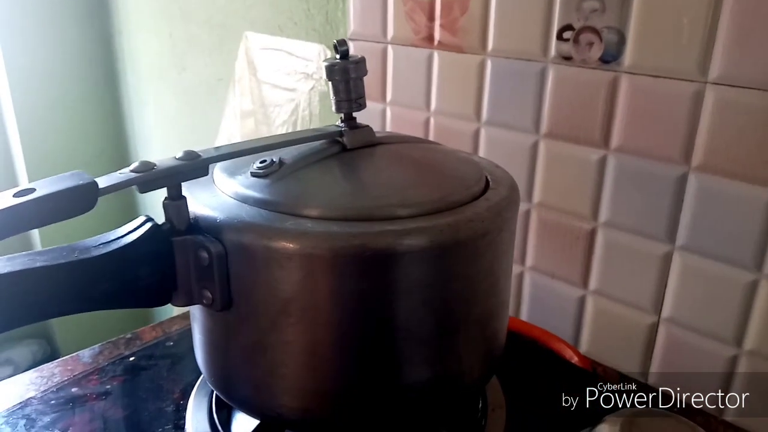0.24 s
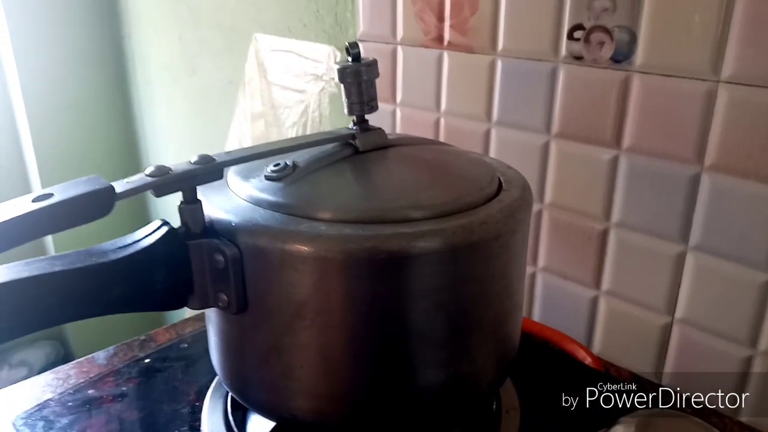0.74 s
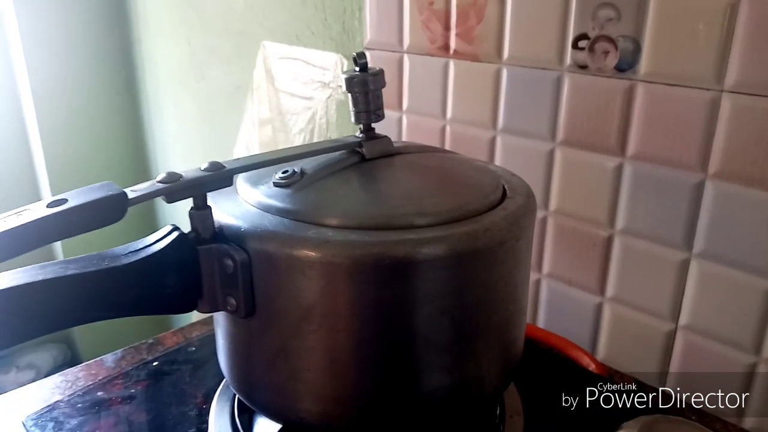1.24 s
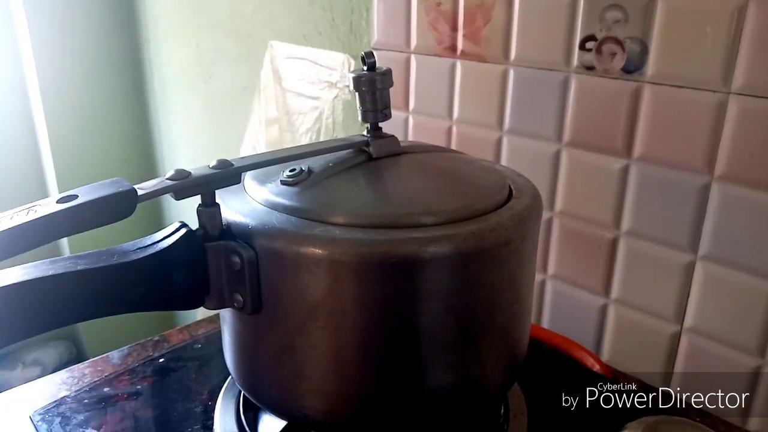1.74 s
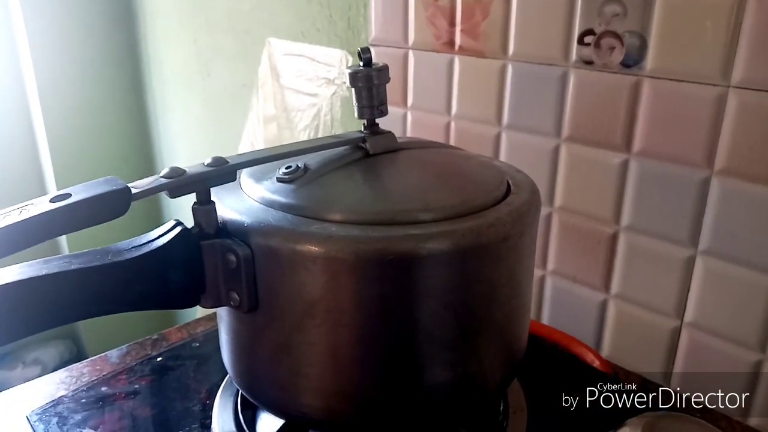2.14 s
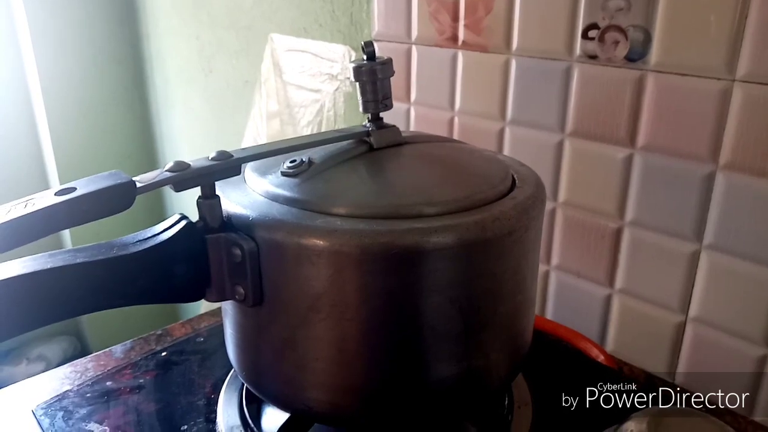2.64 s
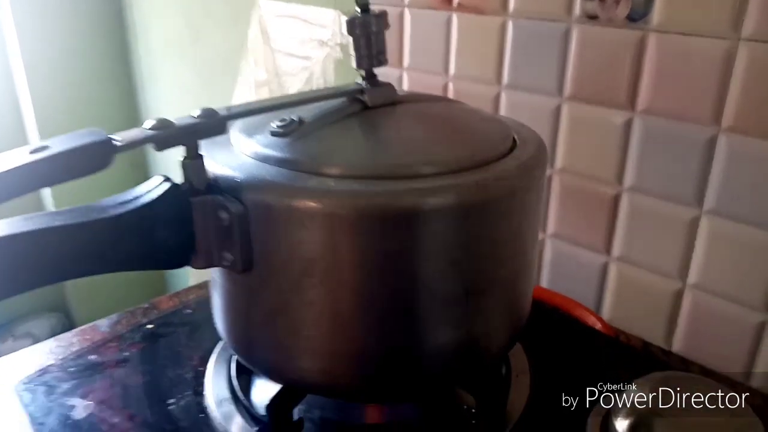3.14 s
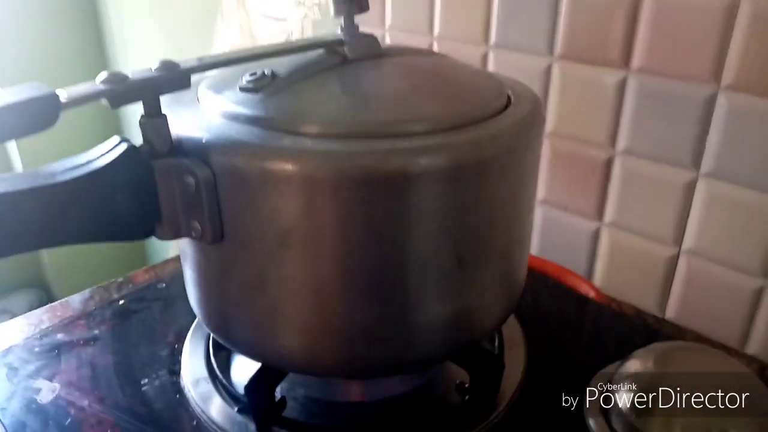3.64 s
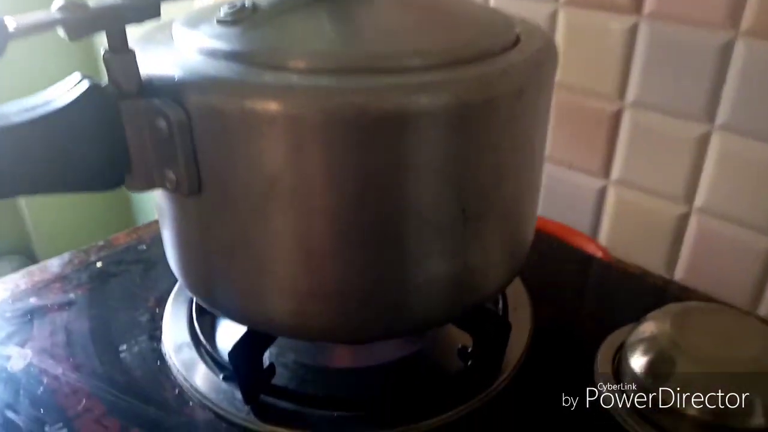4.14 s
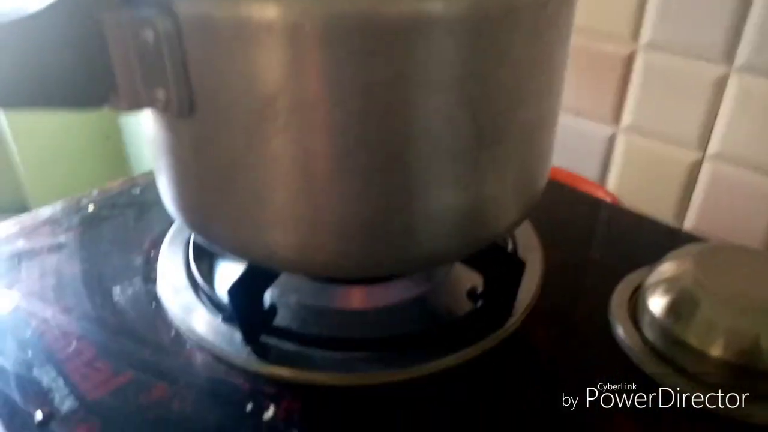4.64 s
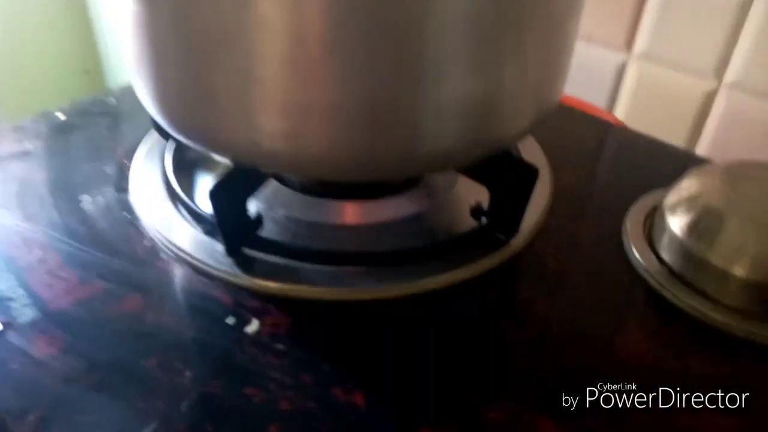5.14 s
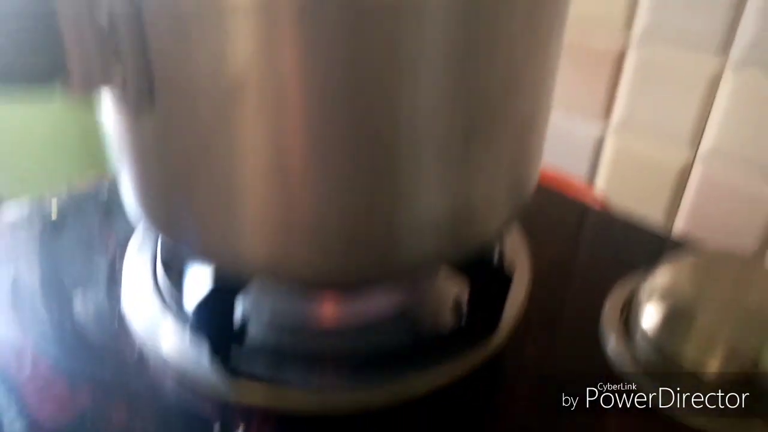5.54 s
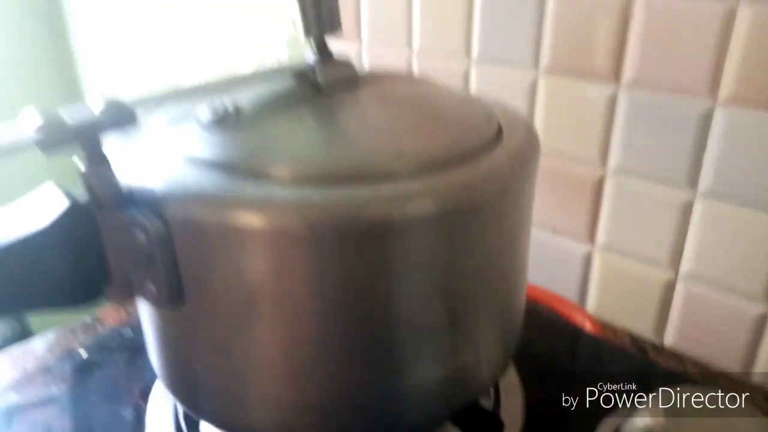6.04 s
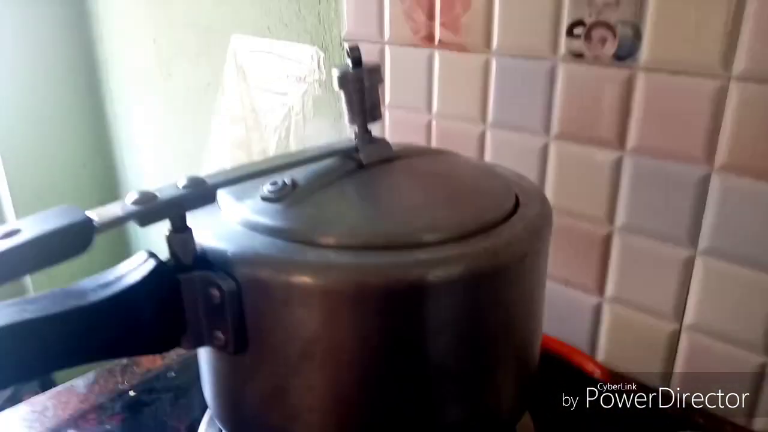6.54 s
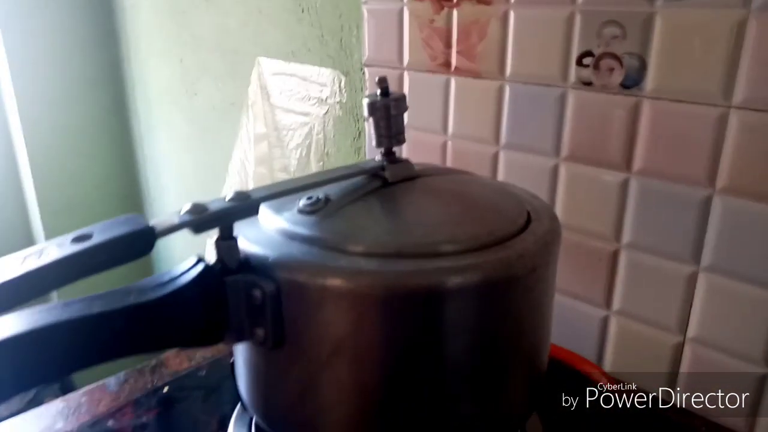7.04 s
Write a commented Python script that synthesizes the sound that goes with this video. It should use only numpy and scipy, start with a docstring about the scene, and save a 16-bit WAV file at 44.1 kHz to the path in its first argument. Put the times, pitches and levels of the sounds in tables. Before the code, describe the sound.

In a small tiled kitchen, a pressure cooker on a gas ring leaks steam in a constant breathy hiss. After a second the valve weight lifts repeatedly, giving short bright gushes with dull puffs. It settles, then gushes again around four, five and a half, and six and a half seconds. Low rumble comes and goes, with a few faint ticks. The close hand-held mono microphone dips toward the burner and rises.

```python
"""A tiled kitchen: a pressure cooker on a gas ring, close to a hand-held mono microphone.
Steam leaks under the valve weight as four bands of shaped noise with a breathy, gliding ridge; the weight
lifts in bouts, and each lift swells the bands into a brighter gush; dull puffs of air come mostly during lifts.
Noise through bass resonances makes a low rumble that comes and goes; the gas ring hisses; a few dull ticks fall.
The microphone dips below the rim and rises again, and close echoes from the tiles comb the hiss."""
import sys
import numpy as np
from scipy import signal
from scipy.fft import rfft, irfft, next_fast_len
from scipy.io import wavfile
from scipy.ndimage import uniform_filter1d, map_coordinates

SR = 44100
rng = np.random.default_rng(int(sys.argv[2]) if len(sys.argv) > 2 else 0)


def put_to_file(sound):
    """Save the sound as 16-bit audio at rate SR, in the file named by the first command-line argument."""
    columns = np.atleast_2d(sound).T  # one column per channel
    safe = np.clip(columns, -1, 1)
    whole_steps = np.round(safe * 32767)
    wavfile.write(sys.argv[1], SR, whole_steps.astype(np.int16))


N = 321028  # samples, about 7.28 s

# The microphone sinks below the rim and rises. Each row: time in seconds, share of the way down (0-1).
MIC_LOWERED = [(0, 0.11), (2.8, 0.15), (3.6, 0.32), (4.4, 0.47), (5.6, 0.51), (6.3, 0.37), (6.9, 0.06),
               (7.28, 0)]


def amp(db):
    """Amplitude factor for a level in dB."""
    return 10 ** (np.asarray(db) / 20)


def unit(x):
    """Scale to an rms of 1."""
    return x / np.sqrt(np.mean(x ** 2) + 1e-20)


def ease(u):
    """A smooth step from 0 to 1."""
    u = np.clip(u, 0, 1)
    return u * u * (3 - 2 * u)


def bell(t, s, spread, order=2):
    """A bump of height 1 around s; a higher order flattens its top."""
    return np.exp(-np.abs((t - s) / spread) ** order / 2)


def along(points, hz):
    """Read a curve of (Hz, value) points on a log frequency axis."""
    f, v = np.transpose(points)
    return np.interp(np.log(hz + 1), np.log(f + 1), v)


def curves(rows):
    """One value per sample for each column after the time."""
    s, *cols = np.transpose(rows)
    t = np.arange(N) / SR
    return [np.interp(t, s, c) for c in cols]


def wobble(rate):
    """A smooth random curve with rate knots a second."""
    knots = rng.standard_normal(int(N * rate / SR) + 4)
    return map_coordinates(knots, [np.arange(N) * rate / SR])


def filtered(x, response):
    """Multiply the spectrum of x by a response of frequency, real or complex."""
    m = next_fast_len(N + SR // 2)
    spectrum = rfft(x, m) * response(np.fft.rfftfreq(m, 1 / SR))
    return irfft(spectrum, m)[..., :N]


def patches(shape, bins, frames):
    """A random field over frequency and time, smoothed over bins and frames, of rms 1."""
    across_hz = uniform_filter1d(rng.standard_normal(shape), size=bins, axis=0)
    return unit(uniform_filter1d(across_hz, size=frames, axis=1))


def turbulence(patchy_db, streak_db, spit_db, spits):
    """Noise with brief patches and long narrow streaks of random gain, and sparse spits (about so many a second)."""
    z = signal.stft(rng.standard_normal(N), nperseg=512)[2]
    field_db = patchy_db * patches(z.shape, 6, 8) + streak_db * patches(z.shape, 2, 90)
    air = unit(signal.istft(z * amp(field_db), nperseg=512)[1][:N])
    drops = (rng.random(N) < spits / SR) * rng.uniform(-1.7, 1, N) * amp(spit_db)
    return air + drops


def booming(levels_db, modes):
    """Low noise that rings in bass resonances, each wavering around its own level."""
    out = np.zeros(N)
    for level_db, (c, w) in zip(levels_db, modes):
        resonance = lambda f: (1j * f * w / (c * c - f * f + 1j * f * w)) ** 2
        boom = filtered(rng.standard_normal(N), resonance)
        out += amp(level_db + 1.9 * wobble(22)) * unit(boom)
    return out


def bass_swells(puff_db):
    """The room's restless bass: the powers of its resting level, its swells and the puffs add up."""
    # Room resonances. Each row: centre in Hz, width in Hz.
    room_modes = [(118.2, 18), (150, 62), (73, 84), (304, 145)]
    # Swells. Each row: middle in seconds, length in seconds, then the level of each resonance in dB.
    swells = [(.34, 0.12, -56, -60, -72, -81), (.51, .09, -61, -61, -78, -65),
              (.72, 0.22, -55, -59, -71, -83), (1.14, 0.19, -52, -56, -72, -64),
              (1.625, 0.095, -59, -72, -80, -72), (1.85, 0.092, -62, -74, -80, -75),
              (2.47, 0.15, -64, -72, -69, -64), (2.63, 0.14, -67, -60, -80, -78),
              (2.95, 0.29, -62, -56.5, -70, -82), (3.37, .2, -59, -62, -66, -59),
              (3.86, .11, -56, -60, -80, -79), (4.065, 0.081, -59, -68, -82, -70),
              (4.33, 0.14, -54, -58, -72, -67), (4.56, 0.28, -52, -59.5, -70, -69),
              (4.99, 0.095, -55, -61, -74, -75), (5.125, 0.11, -54, -62, -72, -60),
              (5.74, .21, -49, -64, -71, -74), (5.93, 0.14, -60, -61, -68, -66),
              (6.72, 0.18, -49, -56, -62, -70), (6.95, 0.34, -50.5, -63, -58, -63),
              (7.25, 0.11, -51, -68, -62, -65)]
    # One value for each resonance: its level at rest in dB.
    still_db = [-72, -71, -75, -73]
    # One value for each resonance: its level against the chuff of a puff in dB.
    thump_db = [-28, -13, -34, -40]
    t = np.arange(N) / SR
    power = amp(still_db)[:, None] ** 2 + np.outer(amp(thump_db), amp(puff_db)) ** 2
    for s, length, *db in swells:
        at = slice(max(round((s - .4) * SR), 0), round((s + .4) * SR))
        shape = bell(t[at], s, length / 2.5, order=4)
        power[:, at] += np.outer(amp(db), shape) ** 2
    return booming(10 * np.log10(power), room_modes)


def heavy_rumble():
    """Half a second in four resonances, the strongest (near 120 Hz) throbbing and fading; also its on/off curve."""
    # One row: start in seconds, stop in seconds, length of the edges in seconds.
    span = (6.0, 6.49, 0.033)
    # Each row: centre in Hz, width in Hz.
    modes = [(119.6, 17), (181, 38), (301.6, 310), (75, 48)]
    # One value for each resonance: level in dB; the first also moves as set below.
    mode_db = [-34.5, -43, -54, -60]
    throb_hz, throb_crest_s, throb_db = 10.4, 6.085, 8
    late_s, fade_db_per_s = 0.035, 20
    t = np.arange(N) / SR
    start, stop, edge = span
    during = ease((t - start) / edge + .5) * ease((stop - t) / edge + .5)
    level_db = np.outer(mode_db, np.ones(N))
    # the resonance near 120 Hz throbs, fades, and comes in late, from 15 dB down
    level_db[0] += throb_db * np.cos(2 * np.pi * throb_hz * (t - throb_crest_s))
    level_db[0] -= fade_db_per_s * (t - start)
    level_db[0] -= 15 * ease((start + late_s - t) / edge + .5)
    return during, booming(level_db, modes)


def rumble(puff_db):
    """The bass of the room, giving way to the heavy rumble while that lasts."""
    room = bass_swells(puff_db)
    during, heavy = heavy_rumble()
    return (1 - during) * room + during * heavy


def flame():
    """The soft mid hiss of the gas ring: patchy noise under a fixed colour."""
    # Each row: time in seconds, level in dB before a common 2.5 dB cut.
    burn = [(0.0, -54), (0.14, -79), (0.56, -45), (2.15, -39), (2.35, -47), (2.61, -48), (2.82, -53),
            (3.04, -40.5), (3.36, -45), (3.63, -43.5), (3.79, -42), (4.07, -43), (4.24, -43), (4.74, -45),
            (5.58, -41), (6.02, -48), (6.45, -42.5), (7.28, -41.5)]
    # Each row: frequency in Hz, relative density in dB per Hz.
    colour = [(500, -27), (900, -12.5), (1300, -6.5), (1650, -0.5), (2000, -4), (2600, -38)]
    air = turbulence(patchy_db=3.5, streak_db=-1.0, spit_db=-3, spits=42)
    hiss = unit(filtered(air, lambda hz: amp(along(colour, hz))))
    return amp(curves(burn)[0] - 2.5) * hiss


def ticks():
    """Short dull bumps without ring: a soft 620 Hz push with grit on it, dying 60 dB in 8.5 ms."""
    # Each row: start in seconds, level in dB before a common 6 dB lift.
    bumps = [(4.327, -38.5), (5.836, -35), (6.154, -39), (6.515, -45)]
    out, t = np.zeros(N + SR), np.arange(800) / SR
    grit = uniform_filter1d(rng.standard_normal((len(bumps), len(t))), size=12, axis=1)
    for (s, db), g in zip(bumps, grit):
        push = np.sin(2 * np.pi * 620 * t) + 2.5 * g
        out[round(s * SR):][:len(t)] += amp(db + 6 - 60 * t / 0.0085) * push
    return out[:N]


def tiles(x):
    """Close echoes comb the hiss finely; their paths shorten as the microphone sinks."""
    # Each row: delay in seconds with the microphone at lid height, level in dB against the direct sound.
    reflections = [(.0017, -26.5), (.0062, -22.5), (.0091, -18.5), (0.0127, -16.5), (0.0178, -20),
                   (.0231, -15.5)]
    at = np.arange(N)
    stretch = 1 - 0.0301 * curves(MIC_LOWERED)[0]
    echoes = sum(amp(db) * map_coordinates(x, [at - s * SR * stretch]) for s, db in reflections)
    return (x + echoes) / np.sqrt(1 + sum(amp(db) ** 2 for _, db in reflections))


def chuff(level_db):
    """The dull push of air in the puffs and under the leak: patchy noise under a low colour."""
    # Each row: frequency in Hz, relative density in dB per Hz.
    colour = [(35, -38), (60, -9), (302, 2), (1130, 3), (1230, 2), (1500, 0.5), (1950, -24), (3300, -120)]
    air = turbulence(patchy_db=2.5, streak_db=1.8, spit_db=-2, spits=45)
    body = unit(filtered(air, lambda hz: amp(along(colour, hz))))
    return amp(level_db + 4.0) * body


def whistle(skirt_db):
    """The valve gap's breathy ridge: narrow noise gliding around 5.0-5.7 kHz, its level following the skirt band."""
    # Each row: time in seconds, centre in Hz, level in dB against the skirt band.
    ridge = [(0, 5500, -7.5), (2.4, 5670, -15), (3.3, 5580, -7), (3.7, 5320, -8.5), (4.5, 5450, -3),
             (4.9, 5350, -5), (5.2, 5100, -1.5), (5.5, 5040, -8), (5.8, 5370, -7.5), (7.28, 5430, -2)]
    hz, rel_db = curves(ridge)
    a, b = filtered(rng.standard_normal((2, N)), lambda f: 1 / (1 + (f / 220) ** 2))
    turn = 2 * np.pi * np.cumsum(hz) / SR
    return amp(skirt_db + rel_db) * unit(a * np.cos(turn) + b * np.sin(turn))


def steam(bands_db):
    """Hiss in four bands, each at its own level; the colour slides from leak to gush as the jet grows."""
    # Four colours of the hiss. Each row: frequency in Hz, relative density in dB per Hz.
    # Weight seated, heard from lid height.
    seated_high = [(530, -45), (900, -32.5), (1570, -16), (1840, -16), (2190, -4), (2850, -3.5),
                   (3450, -7.5), (3970, -4.5), (4690, -10), (5410, -5), (8110, -15), (10400, -2.5),
                   (12700, -13), (14900, -3), (15400, -9)]
    # Weight seated, heard from below the rim.
    seated_low = [(530, -47), (900, -24.5), (1460, -12.5), (2090, -28), (2590, -1.5), (3060, -4.5),
                  (3530, -11), (5290, -8), (6390, 1.5), (6950, -16.5), (8110, -11.5), (10800, -7.5),
                  (12900, -13), (14700, -4), (15400, -10)]
    # Weight lifted, heard from lid height.
    lifted_high = [(880, -38), (1500, -11), (1750, -9), (2370, 5.5), (2740, 7), (4130, -4), (4650, -3),
                   (5020, -7.5), (5540, -4), (6470, -4), (8340, -11), (10800, -1.5), (13400, -7),
                   (14500, 3), (15400, -0.5)]
    # Weight lifted, heard from below the rim.
    lifted_low = [(880, -32.5), (1500, -8), (1990, -17), (2770, -1), (4340, -2), (5170, 7.5), (5760, 3.5),
                  (6470, 6.5), (7060, -17), (7640, -8), (8250, -15), (10900, -4.5), (13200, -15),
                  (14700, -5), (15400, -4)]
    # Centres of the throat, skirt, jet and fizz bands in Hz.
    anchor_hz = [3000, 5200, 9500, 14000]
    lift = np.clip((bands_db[2] + 32.5) / 8, 0, 1)
    low = np.clip(curves(MIC_LOWERED)[0], 0, 1)
    flutter = amp(0.17 * wobble(17) + 0.36 * wobble(40))
    air = flutter * turbulence(patchy_db=1.06, streak_db=2.0, spit_db=11.5, spits=130)
    out = np.zeros(N)
    for k, level_db in enumerate(bands_db):
        band = np.c_[anchor_hz, np.eye(4)[k]]  # 1 at its own centre, 0 at the others
        leak, shaded, gush, shaded_gush = [
            unit(filtered(air, lambda hz: amp(along(colour, hz)) * along(band, hz)))
            for colour in (seated_high, seated_low, lifted_high, lifted_low)]
        seated = (1 - low) * leak + low * shaded
        lifted = (1 - low) * gush + low * shaded_gush
        out += amp(level_db) * ((1 - lift) * seated + lift * lifted)
    return out


def valve():
    """The weight rocks, lifts and seats: levels in dB of the four hiss bands, the puffs and the whole chuff."""
    # The slow leak between lifts. Each row: time in seconds, then the levels in dB of the throat, skirt,
    # jet and fizz bands.
    seep = [(0, -32.5, -31.5, -35, -38), (.45, -30, -29.5, -33.5, -36), (.8, -28.5, -29.5, -31, -35),
            (1.22, -31, -29, -36.5, -34.5), (2.2, -32, -29.5, -33, -37.5), (2.42, -32.5, -33, -37.5, -36.5),
            (3.2, -33, -30.5, -34.5, -35.5), (3.58, -30.5, -29, -30.5, -35.5), (4.62, -32.5, -30, -37, -41),
            (4.85, -32, -27, -35, -37), (5.15, -33.5, -26.5, -31, -34), (5.62, -32, -27.5, -38, -40),
            (5.9, -31.5, -29, -35.5, -39), (6.35, -31, -29, -31.5, -33), (6.9, -31, -29, -35.5, -36),
            (7.28, -34, -30, -34, -33)]
    # Lifts of the weight. Each row: time it drops back in seconds, length of the lift in seconds, rise in
    # seconds, share of the swell that sags away, swells of throat, skirt, jet and fizz in dB, dip in dB as
    # it seats (a bump where negative).
    lifts = [(1.038, .24, .15, 0, -0.5, 3.5, 5.2, 8.1, 4.5), (1.17, 0.15, .03, .5, 1.5, 3.3, 2.6, 2, -2),
             (1.6, 0.43, 0.37, 0, 2.5, 2.3, 7.8, 9, 3), (1.822, 0.24, .1, 0, 5, 3.7, 8, 12, 5),
             (2.025, 0.25, 0.15, 0, 4.5, 2.7, 6.7, 14.7, 3), (2.252, 0.23, 0.056, 0, 3.5, 2, 5.7, 11.6, 2),
             (2.39, .13, 0.019, 0.93, 4.5, 4.1, 2, 1.8, -1),
             (3.828, 0.27, 0.18, 0.17, 2.5, 2.6, 5.6, 10.4, 0), (4.02, 0.17, 0.028, .5, -1, 4, 4.6, 8, 7),
             (4.227, 0.21, 0.094, 0, 4.5, 2.2, 8.5, 14, 4), (4.31, 0.077, 0.037, 0, 7.5, 5.7, 8.3, 7, -5),
             (4.579, 0.28, 0.084, 0.87, 4.5, 5.2, 8.6, 8.1, 1),
             (5.333, 0.2, 0.12, 0.13, 1.5, 2.6, 8.7, 14, 6), (5.586, 0.26, 0.1, .3, 3.5, 5.2, 12.2, 16, 5),
             (5.7, .1, .03, .5, 1, 1.8, 2, 3, -4), (6.635, .27, 0.26, 0, 3.5, 4, 10.5, 14, 0),
             (6.711, 0.078, 0.043, 0, -3, 3.4, 6.7, 10, -2),
             (6.85, .135, 0.025, 0.67, 2.5, 1.6, 4.2, 4.4, 1)]
    # One value for each band: seconds it takes to die as the weight falls back.
    fall_s = [0.088, 0.042, 0.051, 0.052]
    # One value for each band: its share of the seating dip.
    dip_share = [0.76, 0.47, 0.3, 1]
    # Puffs of dull air, most of them during a lift. Each row: middle in seconds, spread in seconds (scaled
    # for each use), level of the chuff in dB before its common lift, throat swell in dB, lag of that swell
    # in seconds.
    puff_rows = [(.52, 0.028, -63, 0, 0), (.955, 0.013, -60, 8, 0.018), (1.15, 0.053, -64, 0, 0.0043),
                 (1.515, .025, -45.5, 5.5, 0.0049), (1.745, 0.03, -51.5, 2.5, -0.022),
                 (1.955, 0.026, -49, 4, 0.031), (2.09, 0.014, -53, 1, 0.011), (2.3, 0.022, -61, 1, -2),
                 (3.735, 0.032, -44.5, 6, 0.013), (3.87, 0.015, -61, 3.5, 0.018),
                 (4.158, 0.023, -38.5, 5.5, -0.0011), (5.258, 0.02, -42.5, 7.5, 0.014),
                 (5.472, 0.037, -44.5, 3.5, -0.0017), (6.574, 0.023, -42, 8.5, 0.0073),
                 (6.77, 0.033, -51.5, 0.5, -0.035), (6.92, 0.045, -55.5, 0, -2.5)]
    # The throat hushes before it swells. One row: lead in seconds, spread in seconds, share of the swell.
    hush = (0.073, 0.019, 0.38)
    seat_s = 0.0059  # spread of the dip as the weight seats
    jet_share = 0.49  # of the throat's swell, in the jet
    chuff_under_db, chuff_waver_db = -32.5, 3  # chuff of the leak against its throat; how far it wavers
    t = np.arange(N) / SR
    bands_db, puffs = np.array(curves(seep)), np.full(N, 1e-12)
    leak = amp(bands_db[0] + chuff_under_db + chuff_waver_db * wobble(14)) ** 2
    for s, length, rise, sag, *swell_db, dip_db in lifts:
        at = slice(round((s - .5) * SR), round((s + .1) * SR))
        since = t[at] - s + length
        sagging = 1 - sag * np.clip((since - rise) / (length - rise), 0, 1)
        held = ease(since / rise) * sagging
        falling = ease((s - t[at]) / np.c_[fall_s])
        dip = np.outer(dip_share, dip_db * bell(t[at], s, seat_s))
        bands_db[:, at] += np.c_[swell_db] * held * falling - dip
    lead, hush_s, share = hush
    for s, spread, db, swell_db, lag in puff_rows:
        at = slice(round((s - .3) * SR), round((s + .3) * SR))
        top = swell_db * bell(t[at], s + lag, spread / 2.2)
        bands_db[0, at] += top - share * swell_db * bell(t[at], s + lag - lead, hush_s)
        bands_db[2, at] += jet_share * top
        puffs[at] += amp(db) ** 2 * bell(t[at], s, 1.13 * spread, order=3) ** 2
    return bands_db, 10 * np.log10(puffs), 10 * np.log10(puffs + leak)


def scene():
    """The valve drives hiss, whistle, chuff and part of the bass; both channels carry the same sound."""
    bands_db, puff_db, chuff_db = valve()
    hiss = steam(bands_db) + whistle(bands_db[1]) + chuff(chuff_db) + flame()
    mono = tiles(hiss) + rumble(puff_db) + ticks()
    return np.array([mono, mono])


def record(dry):
    """The port colours the sound, the loudest peaks are rounded, and nothing is kept above the band limit."""
    # Colour of the microphone port. Each row: frequency in Hz, gain in dB.
    port = [(2000, -2), (2350, -1), (2750, 2), (3100, 1), (3400, -1.5), (4900, -1.5), (6650, 0), (6900, -1),
            (7600, 1), (8300, -3.5), (10000, 0), (10350, 0), (10700, 2), (12500, 2), (13800, -2.5),
            (14300, 3.5)]
    full = .62  # amplitude that the rounded peaks approach
    top_hz = 15580  # band limit
    heard = filtered(dry, lambda hz: amp(along(port, hz)))
    rounded = heard / (1 + np.abs(heard / full) ** 4) ** (1 / 4)
    return filtered(rounded, lambda hz: np.clip((top_hz - hz) / 120, 0, 1) ** 3)


dry = scene()
out = record(dry)
put_to_file(out)
```